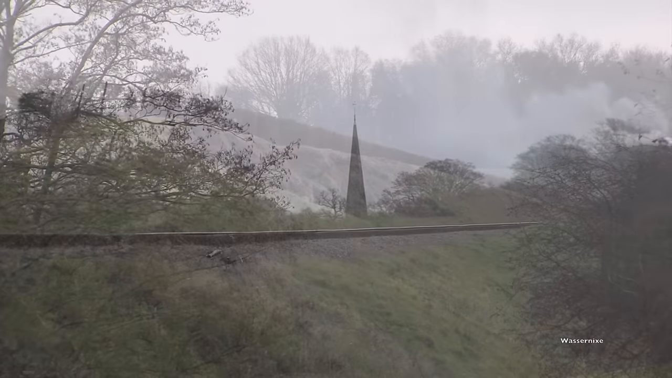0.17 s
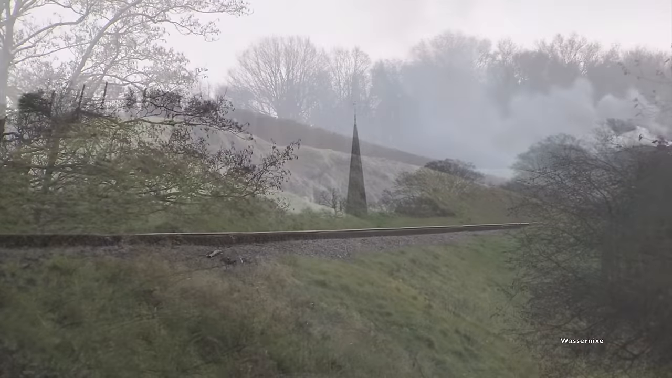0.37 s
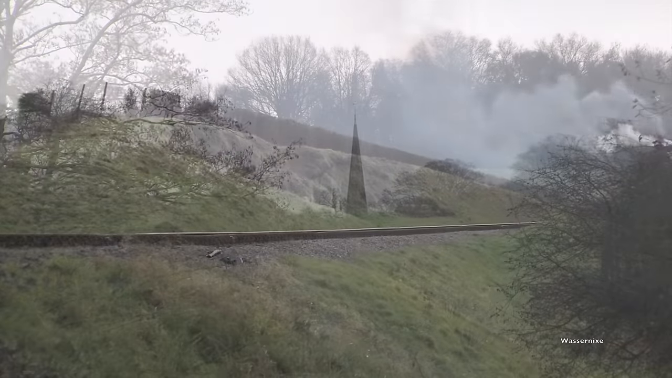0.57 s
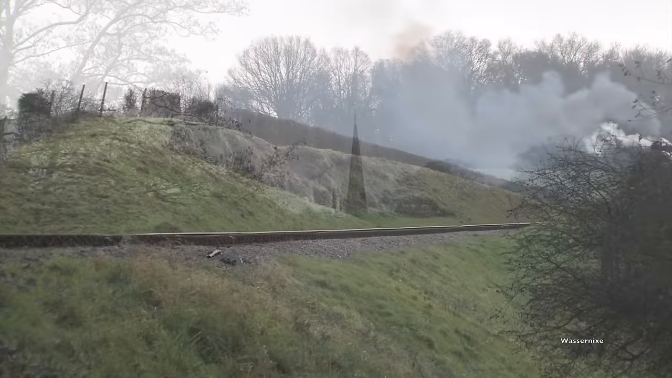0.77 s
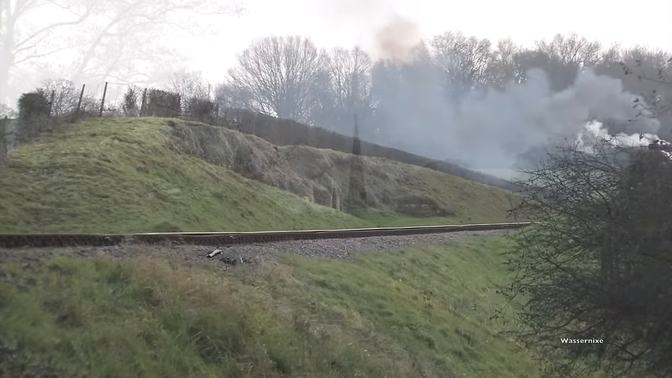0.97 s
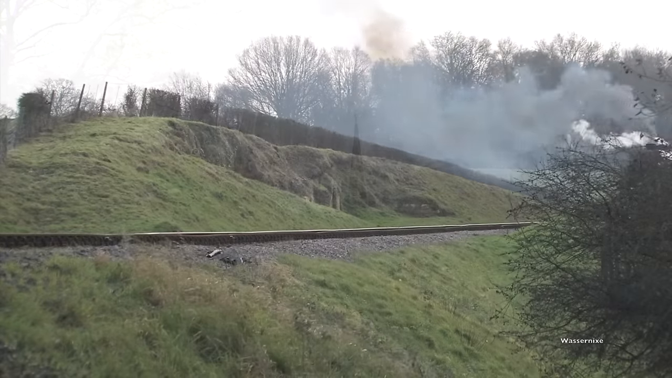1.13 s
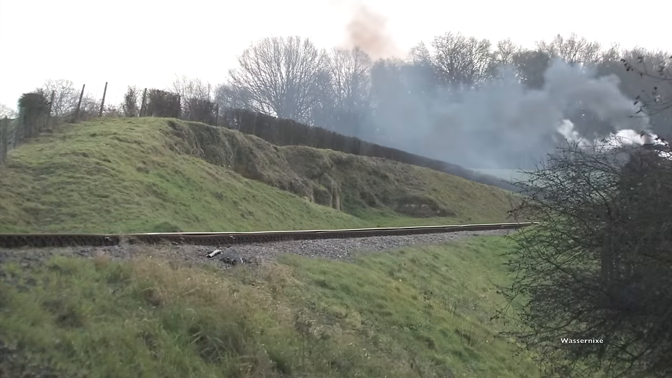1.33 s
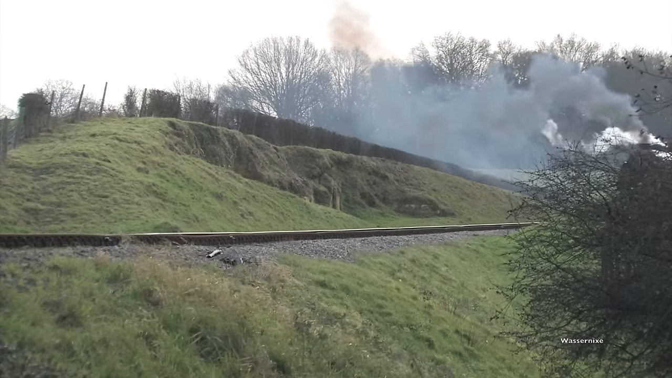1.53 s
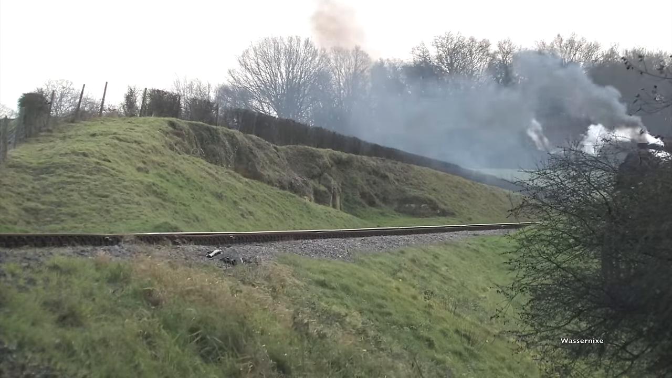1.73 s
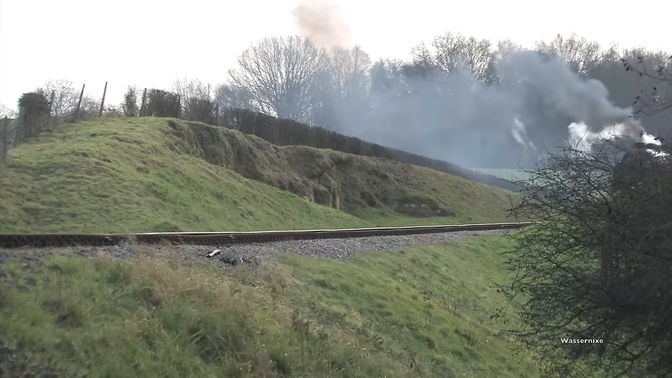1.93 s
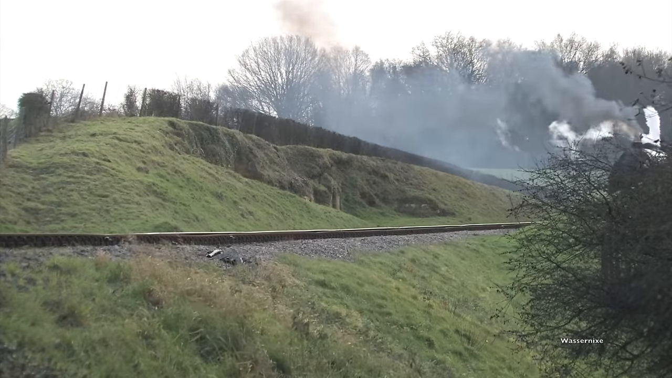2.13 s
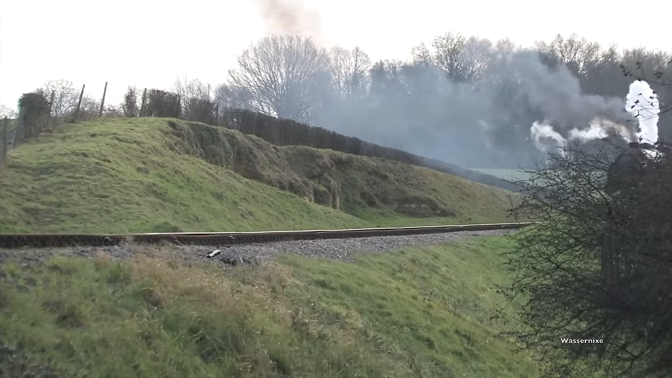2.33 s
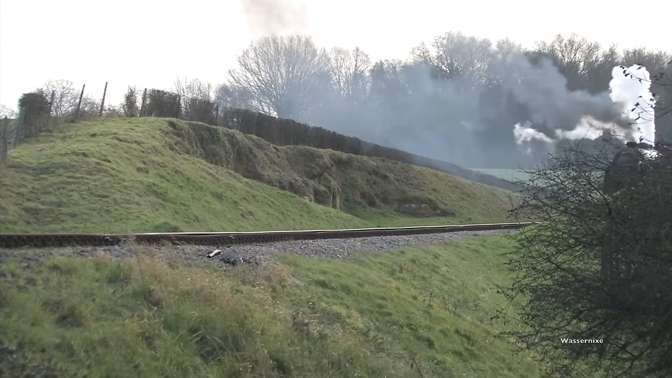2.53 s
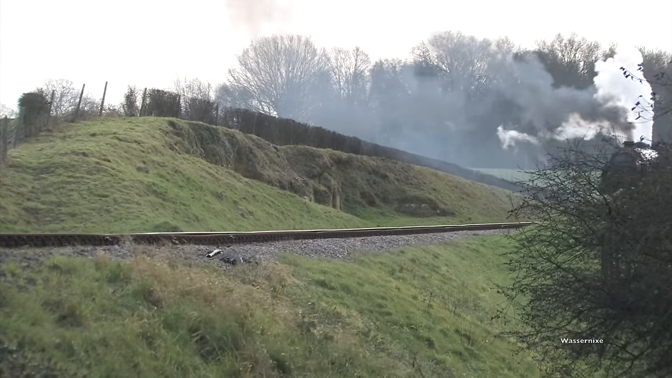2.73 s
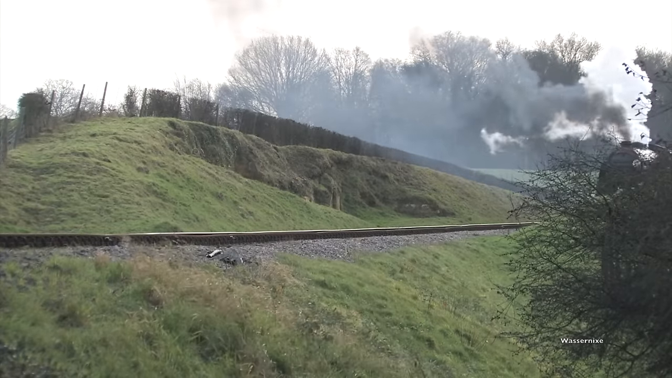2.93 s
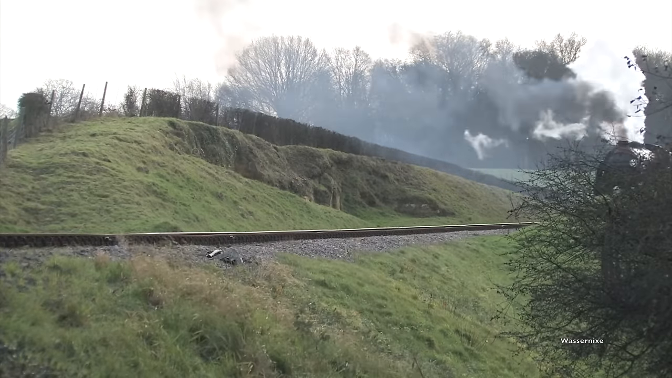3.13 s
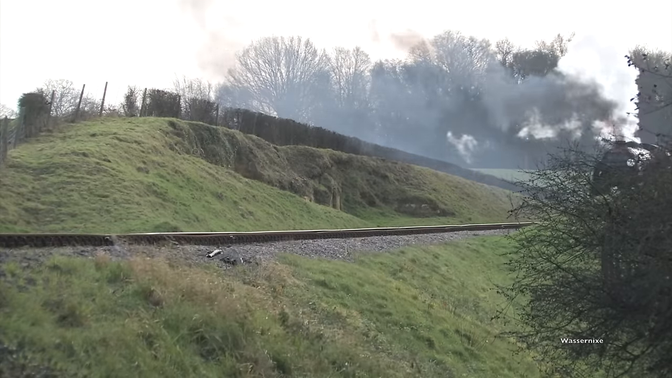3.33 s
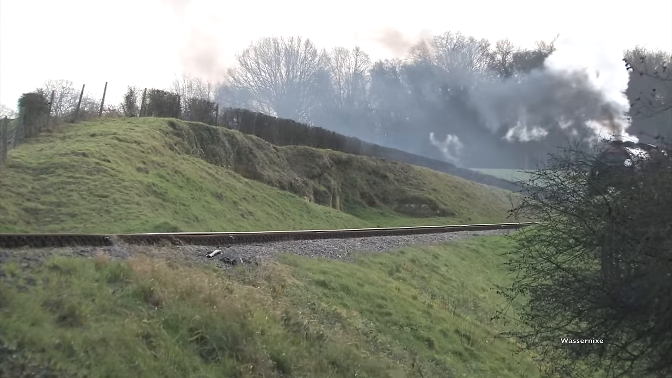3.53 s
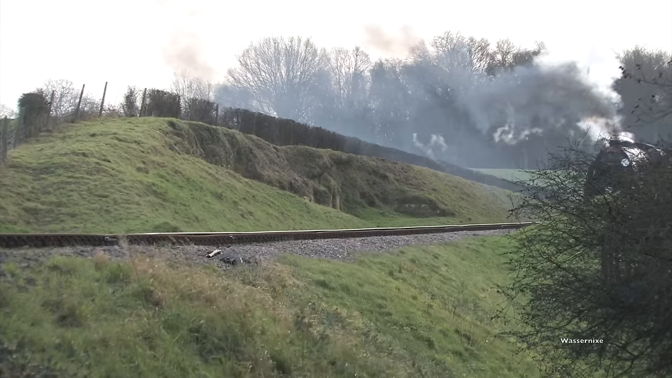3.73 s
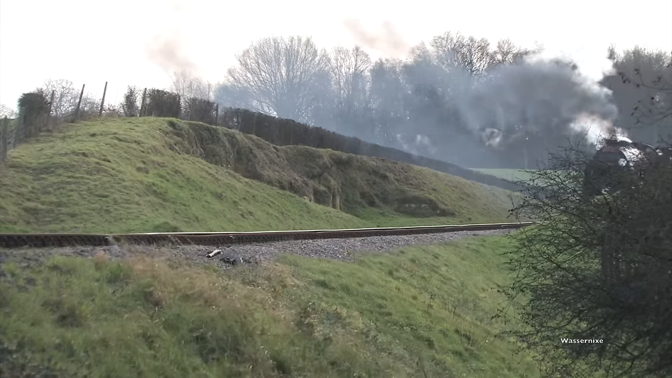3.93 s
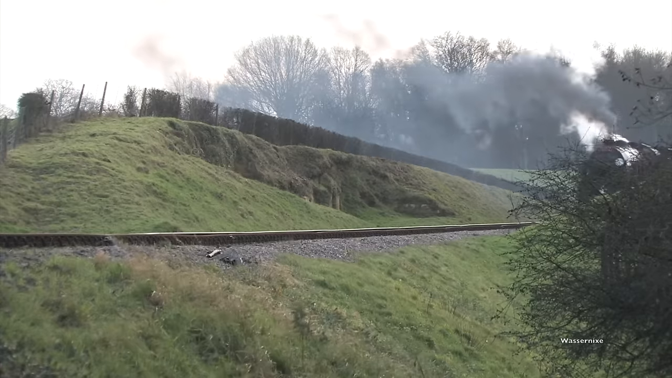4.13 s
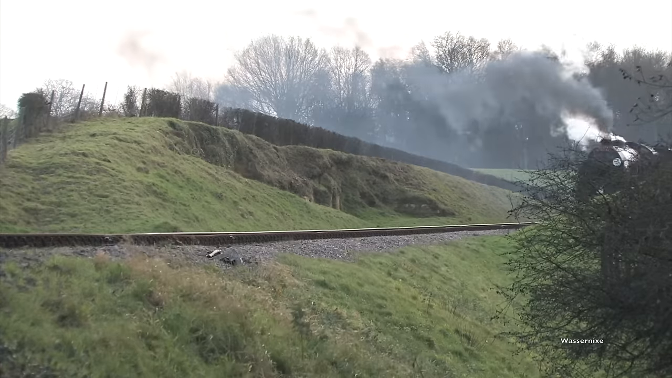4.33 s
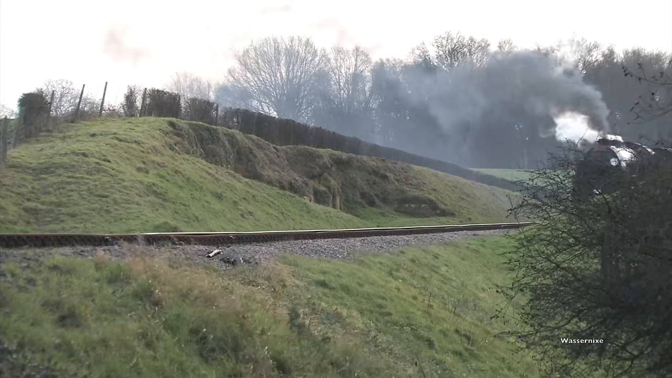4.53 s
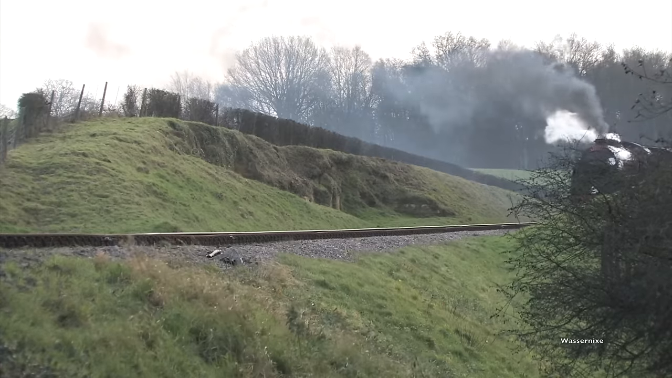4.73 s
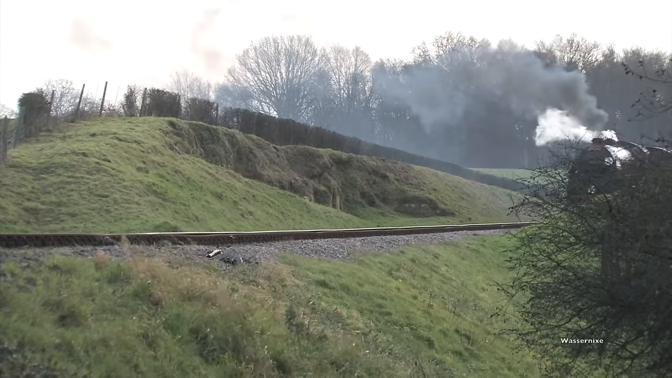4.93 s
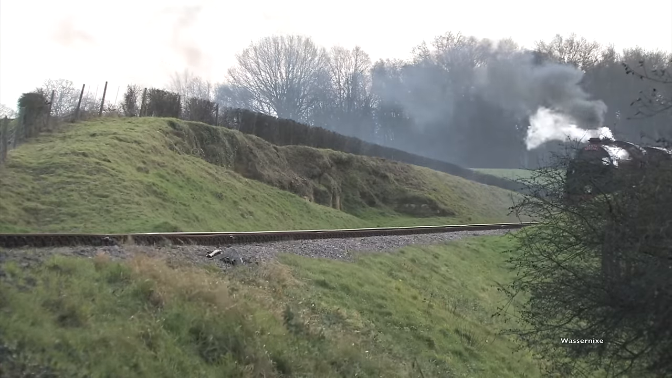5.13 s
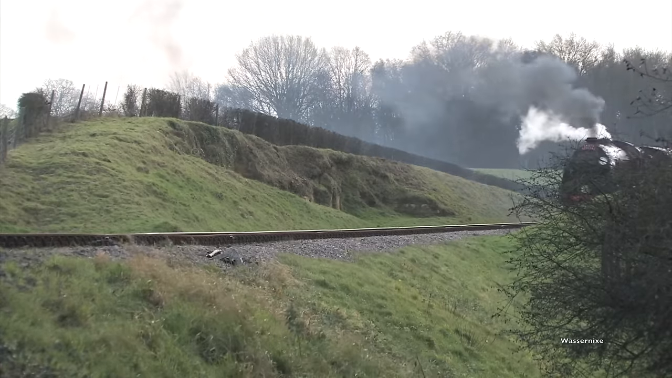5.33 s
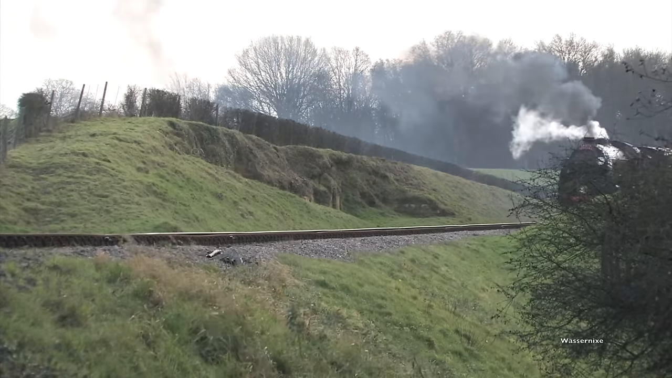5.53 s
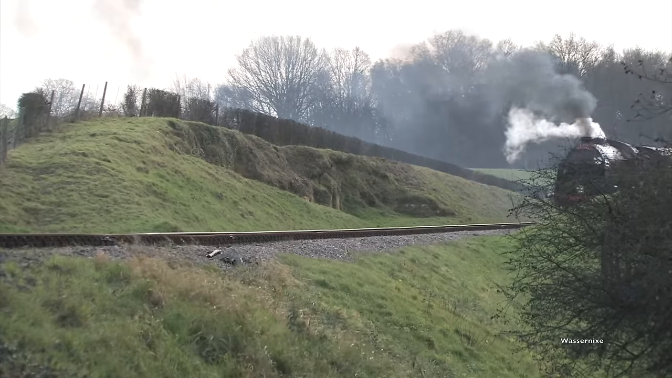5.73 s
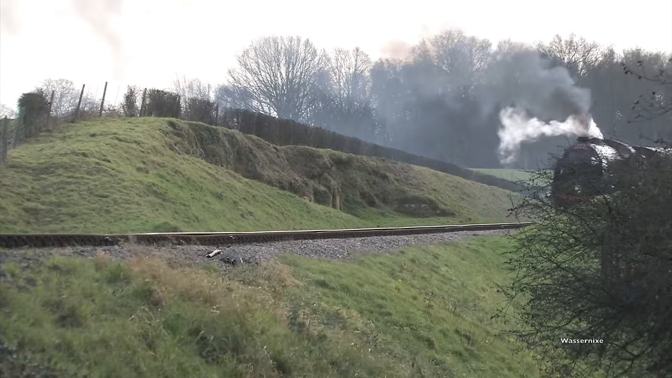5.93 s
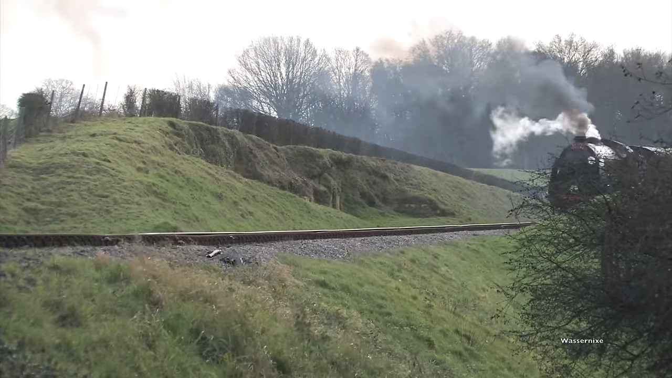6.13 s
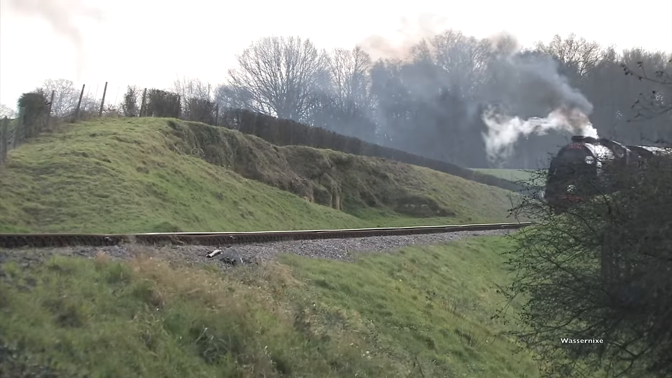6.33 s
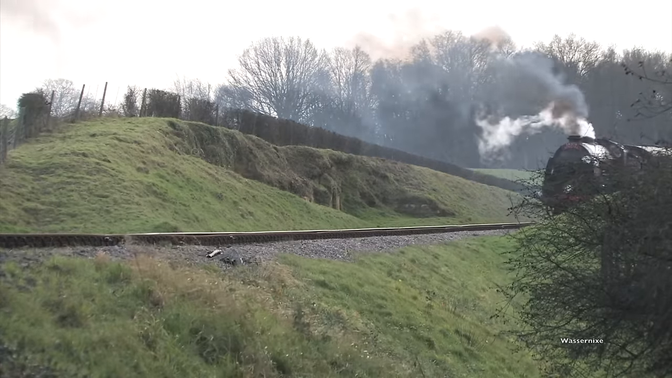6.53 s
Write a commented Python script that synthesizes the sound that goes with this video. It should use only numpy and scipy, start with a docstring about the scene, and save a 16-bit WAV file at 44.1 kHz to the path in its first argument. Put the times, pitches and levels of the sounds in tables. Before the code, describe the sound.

A steam locomotive rumbles and hisses quietly, then its whistle gives one long shrill, overloading blast and one short one, ringing away over the hills.

```python
"""Open country: a steam locomotive rolls slowly by its engine rumble, leaking steam and singing wheels.
A thin high whine sinks back, a small bird chips faintly, and flanges rub the rails before and after the whistle.
Then one long blast and one short scoop up as the valve opens, from surging steam on a bell, and ring on from
a grassy bank nearby and the far hills and woods. The loudest peaks overload the microphone and are cut flat.
Rumble, steam and air are shaped noise, wheels are shaken resonances, whistle and whine are built from sines."""
import sys
import numpy as np
from scipy import signal
from scipy.fft import rfft, irfft
from scipy.io import wavfile
from scipy.ndimage import uniform_filter1d

SR = 44100
rng = np.random.default_rng(int(sys.argv[2]) if len(sys.argv) > 2 else 0)


def master_out(mix):
    """Clip the mix to full scale and print it as 16-bit PCM to the path in sys.argv[1]."""
    frames = np.transpose(np.atleast_2d(mix))
    ceiling = np.clip(frames, -1, 1)
    pcm = np.round(ceiling * 32767).astype(np.int16)
    wavfile.write(sys.argv[1], SR, pcm)


N = 290178
TIME = np.arange(N) / SR  # s

# Levels are relative: each source adds its own trim. Noise spectra are in dB per Hz, then evened to rms 1.
# engine rumble: frequency_hz, density_db
RUMBLE_SPECTRUM = [(15, -44), (28, -28.5), (45, -5), (100, -5.5), (160, 1), (250, -13), (450, -19),
                   (1000, -33.5), (4000, -67)]
# the labouring engine, eased off at the whistle: time_s, level_db
RUMBLE_LEVEL = [(0.0, -46), (0.25, -47), (2.01, -43.5), (2.5, -46.5), (5.27, -52), (6.55, -52)]
# leaking steam: frequency_hz, density_db
LEAK_SPECTRUM = [(500, -4), (1500, -5), (2700, -4), (3900, -1.5), (4700, 1), (5300, -4.5), (5900, -15),
                 (7700, -11), (9500, -27), (15000, -43)]
# loudness of leaking steam and rolling wheels, fades in at the start, then swells slowly: time_s, level_db
STEAM_AND_WHEELS_LEVEL = [(0, -55), (1.15, -48.5), (2.6, -44), (4.8, -45.5), (6.58, -41.5)]
# the open air: frequency_hz, density_db
AIR_SPECTRUM = [(20, -25.5), (150, -2), (300, 1), (520, -1.5), (1000, -7), (2500, -15.5), (6000, -16),
                (9000, -25), (15000, -35)]
# likeness of left and right in the background: frequency_hz, likeness_0_to_1
LIKENESS = [(30, .2), (120, 0.43), (500, 0.34), (2000, 0.56), (4500, 0.21), (9000, 0.2)]
# resonances of wheels and rails: frequency_hz, width_hz, rolling_level_db
WHEEL_MODES = [(1580, 50, -11), (2060, 103, -5), (3200, 130, -2.5), (3510, 95, -10.5), (4530, 470, -6)]
# a flange rubs the rail and wakes modes near one frequency: middle_s, half_length_s, frequency_hz, level_db
FLANGE_RUBS = [(.97, 0.17, 4060, -51), (1.41, .06, 4800, -50), (1.65, 0.35, 2050, -52),
               (1.74, 0.086, 4500, -47.5), (1.913, 0.035, 3200, -50), (2.32, 0.052, 4300, -49),
               (5.396, 0.062, 4320, -52), (5.89, 0.043, 3100, -50), (6.116, 0.098, 4480, -48),
               (6.424, 0.16, 3815, -45)]
# lines of the thin high whine: frequency_hz, level_db
WHINE_LINES = [(5098, -68.5), (5399, -63), (5701, -65.5), (6002, -88)]
# rise and fall of the whine: time_s, gain_db
WHINE_FADE = [(0, 6), (.55, 2.5), (.8, -4), (6.58, -2.5)]
# faint chips of a small bird: middle_s, frequency_hz, level_db
BIRD_CHIPS = [(.455, 6230, -54), (.625, 6200, -57), (.668, 6200, -50)]
# whistle blasts: start_s, opening_s, shut_s, closing_s, jet_strength_db
BLASTS = [(2.647, .062, 3.395, 0.01497, 0.5), (3.512, .050, 3.661, 0.0125, -2.5)]
# the driver's pull on the open valve, surging, easing, then held: time_s, pitch_hz, jet_strength_db
DRIVER_PULL = [(2.71, 1021, -22.5), (2.762, 1030, -20.5), (2.896, 1046, -13), (3.006, 1021, -22),
               (3.046, 1015, -25.5), (3.132, 1014, -18), (3.22, 1022, -20), (3.375, 1011, -20.5)]
USUAL_JET_DB = -20
# partials 1 to 4: level_db at the usual jet, gain_db_per_jet_db, drift_db_per_s as the engine rolls on,
# overblown_change_db, half_open_change_db
PARTIALS = [(-10, 0.34, -2, -9, .5), (-15, 0.37, -15.5, 1.5, -8), (-15.5, .5, -1.5, 8.5, -4.5),
            (-22, 1.64, -1.5, -1, 9)]
# partials 5 and up: level_db against the steam rush
OVERTONE_LEVELS = [-4, -15, -18, -25]
# the note tips over into its third partial: middle_s, half_length_s
OVERBLOW = (3.155, .07)
# partials 1 to 6 as sent out to the hills: level_db
SENT_LEVELS = [-9, -18.5, -20.5, -19.5, -27, -31]
# the jet's rush, coloured by the bell: frequency_hz, density_db
RUSH_SPECTRUM = [(100, -36), (500, -21), (820, -10), (1200, -6.5), (1600, -15), (2200, -10), (2700, -15),
                 (3250, -5.5), (3800, -7), (4350, -2), (4850, -8.5), (5900, -23), (8200, -24.5),
                 (13000, -56)]
# bell modes the jet only roughens, out of tune with the note: multiple_of_pitch, width_hz, level_db
BELL_MODES = [(3.19, 110, -8), (4.18, 130, -2), (4.43, 89.5, -7.5)]
# grassy bank nearby: frequency_hz, decay_t60_s
BANK_T60 = [(1000, 1.55), (6000, 0.61)]
# grassy bank nearby: frequency_hz, echo_level_db
BANK_COLOUR = [(700, -7.5), (1000, -10.5), (3000, -9), (4500, -8.5), (7000, -2.5)]
# grassy bank nearby: frequency_hz, right_over_left_db
BANK_BALANCE = [(1000, 2), (6000, 5.6)]
# far hills and woods: frequency_hz, decay_t60_s
HILLS_T60 = [(300, 1), (1000, 5), (2000, 4), (3000, 3.5), (4100, 3), (6000, 1.5), (10000, 5)]
# far hills and woods: frequency_hz, echo_level_db
HILLS_COLOUR = [(300, -13.5), (800, -23.5), (1020, -8.5), (2000, -8.5), (4100, -9.5), (6000, -12.5),
                (10000, -25)]
# far hills and woods: frequency_hz, right_over_left_db
HILLS_BALANCE = [(600, 4.6), (1000, 11.2), (2000, 2.7)]
# the moving engine is heard at a different pitch from each slope: pitch_ratio, level_db, build_up_s
SLOPES = [(.985, -1.5, .35), (.998, -3, .6)]
EDGE_HZ = 15800  # upper band limit


def gain_of(db):
    """Amplitude factor of a level in dB."""
    return 10 ** (np.asarray(db) / 20)


def evened(x):
    """Scales to rms 1."""
    return x / np.sqrt(np.mean(x ** 2) + 1e-20)


def spectrum_at(points, hz):
    """Reads a spectrum table on a log-frequency axis."""
    table_hz, value = np.transpose(points)
    return np.interp(np.log(hz + 1), np.log(table_hz + 1), value)


def curves(rows):
    """Each column of a time table after the first, at every sample."""
    time_s, *columns = np.transpose(rows)
    return [np.interp(TIME, time_s, column) for column in columns]


def panned(right_db):
    """Gains of left and right, with the right channel stronger by right_db."""
    return gain_of(np.array([[-right_db], [right_db]]) / 2)


def wander(hz, size=N):
    """Smooth chance of rms about 1, whose faster changes weaken above hz."""
    step = 16  # samples between random knots
    knots = rng.standard_normal(size // step + 2)
    f = np.fft.rfftfreq(len(knots), step / SR)
    knots = evened(irfft(rfft(knots) / (1 + (f / hz) ** 2), len(knots)))
    return np.interp(np.arange(size) / step, np.arange(len(knots)), knots)


def noise(spectrum, patchy_db, same=None):
    """Stereo turbulence: noise of a given spectrum, with uneven patches in time and frequency."""
    frame, hop = 2048, 1024  # samples
    hz = np.fft.rfftfreq(frame, 1 / SR)
    a, b, c, d, patches = rng.standard_normal((5, len(hz), N // hop + 4))
    patches = uniform_filter1d(patches, size=4, axis=1)
    patches = evened(uniform_filter1d(patches, size=18, axis=0))
    if same is None:
        same = spectrum_at(LIKENESS, hz)[:, None]
    same = np.clip(same, 0, 1)
    left = a + 1j * b
    right = same * left + np.sqrt(1 - same ** 2) * (c + 1j * d)
    colour = gain_of(spectrum_at(spectrum, hz)[:, None] + patchy_db * patches)
    bins = np.array([left, right]) * colour
    return evened(signal.istft(bins, window="cosine", nperseg=frame, noverlap=hop)[1][:, :N])


def hoarse(hz, width, apart=0.18):
    """A resonance along the curve hz, shaken at random, a little different at each side."""
    carrier = np.exp(2j * np.pi * np.cumsum(hz) / SR)

    def shaken():
        real_part = wander(width * 0.43, size=len(hz))
        imaginary_part = wander(width * 0.64, size=len(hz))
        return (carrier * (real_part + 1j * imaginary_part)).real

    mid, side = shaken(), shaken()
    return evened(np.array([mid + apart * side, mid - apart * side]))


def engine(air_db=-46.5, rumble_db=2.5):
    """Low rumble and steam hissing from leaks, in the open air: three layers of turbulent noise."""
    rumble = gain_of(rumble_db + curves(RUMBLE_LEVEL)[0]) * noise(RUMBLE_SPECTRUM, patchy_db=1.5)
    leak = gain_of(curves(STEAM_AND_WHEELS_LEVEL)[0]) * noise(LEAK_SPECTRUM, patchy_db=3.0)
    air = gain_of(air_db) * noise(AIR_SPECTRUM, patchy_db=1)
    return (rumble + leak + air) * panned(right_db=4.0)


def rails(rolling_db=-10.5, rubbing_db=-2.5, uneven_db=3.0, reach_octaves=0.36):
    """Wheel and rail modes sing thinly in rolling, and swell hoarsely where a flange rub lies near in pitch."""
    out = np.zeros((2, N))
    rolling_level_db = rolling_db + curves(STEAM_AND_WHEELS_LEVEL)[0]
    swells = [gain_of(rubbing_db + db) * np.exp(-((TIME - middle) / half) ** 2)
              for middle, half, _, db in FLANGE_RUBS]
    for hz, width, db in WHEEL_MODES:
        rubbing = 0
        for swell, (_, _, rub_hz, _) in zip(swells, FLANGE_RUBS):
            rubbing = rubbing + swell * np.exp(-(np.log2(hz / rub_hz) / reach_octaves) ** 2)
        level = (gain_of(rolling_level_db + db) + rubbing) * gain_of(uneven_db * wander(hz=17))
        out += level * hoarse(np.full(N, hz), width)
    return out * panned(right_db=2.0)


def whine():
    """Thin lines of fixed pitch, wavering together in level, that soon sink into the background."""
    lines = sum(gain_of(db) * np.sin(2 * np.pi * (hz * TIME + rng.random())) for hz, db in WHINE_LINES)
    level = gain_of(curves(WHINE_FADE)[0] + wander(hz=8))
    return np.sqrt(2) * lines * level * panned(right_db=-5)


def bird(length_s=.009, rough=.03):
    """Very short high notes, raspy because their pitch is shaken at random."""
    rasp = 1 + rough * wander(hz=500)
    out = np.zeros(N)
    for middle, hz, db in BIRD_CHIPS:
        swell = gain_of(db) * np.exp(-((TIME - middle) / length_s) ** 2)
        out += swell * np.sin(2 * np.pi * np.cumsum(hz * rasp) / SR)
    return out


def valve():
    """Steam pressure at the whistle as the valve moves, 0 shut to 1 open."""
    return sum(np.clip(np.minimum((TIME - start) / opening, (shut - TIME) / closing), 0, 1)
               for start, opening, shut, closing, _ in BLASTS)


def jet():
    """Strength of the steam jet from pull and blast, in dB over the usual."""
    blast_db, = curves([(s, db) for start, _, shut, _, db in BLASTS for s in (start, shut)])
    return curves(DRIVER_PULL)[1] + blast_db - USUAL_JET_DB


def pitch(pressure, scoop=.28, bend=1.3):
    """The note (Hz) scoops up as the valve opens and drops as it shuts."""
    return curves(DRIVER_PULL)[0] * (1 - scoop * (1 - pressure) ** bend)


def rush_level(usual_db=-23.5, follows=0.95):
    """The rush of steam grows with the jet (dB)."""
    return usual_db + follows * jet()


def partial_levels(pressure):
    """A harder jet brightens the note; overblown, the third partial takes over; half open, the fourth shrieks (dB)."""
    middle, half = OVERBLOW
    overblown = np.exp(-((TIME - middle) / half) ** 4)
    half_open = np.sin(np.pi * pressure ** 2)
    since, jet_db = TIME - BLASTS[0][0], jet()
    low = [db + follows * jet_db + drift * since + over_db * overblown + half_db * half_open
           for db, follows, drift, over_db, half_db in PARTIALS]
    return low + [rush_level() + db for db in OVERTONE_LEVELS]


def whistle(pressure, jitter=0.0026, stumble=.025, flutter_db=0.67, sway_db=1.65, speaks_at=0.39, richness=1.0):
    """The bell's tone, flat and pure at low pressure, rich at full: as heard along the ground, and as sent aloft."""
    on = pressure > 0
    unsteady = (jitter + stumble * (1 - pressure)) * wander(hz=130)  # least with the valve fully open
    phase = 2 * np.pi * np.cumsum(pitch(pressure) * (1 + unsteady))[on] / SR
    first = np.clip(pressure[on] / speaks_at, 0, 1) ** 2
    near, aloft = np.zeros((2, N)), np.zeros(N)
    for k, db in enumerate(partial_levels(pressure), 1):
        share = first if k == 1 else first * pressure[on] ** richness
        partial = np.sqrt(2) * share * np.sin(k * phase + rng.uniform(0, 2 * np.pi))
        flutter = flutter_db * min(k, 4) * wander(hz=69)[on]  # turbulent air shakes high partials most
        sway = sway_db * np.array([wander(hz=16)[on] for _ in range(2)])  # slower, different at each side
        near[:, on] += gain_of(db[on] + flutter + sway) * partial
        if k <= len(SENT_LEVELS):
            aloft[on] += gain_of(SENT_LEVELS[k - 1]) * partial
    return near, aloft


def rush(pressure, hiss_db=6, ring_db=-1.0, hiss_lag=0.43, ring_lead=0.22, hiss_onset=1.6, ring_onset=1.0):
    """Steam tears past the bell's lip and makes its upper modes ring hoarsely; a harder jet rings more."""
    hiss = noise(RUSH_SPECTRUM, patchy_db=3.5, same=0.84) * pressure ** hiss_onset
    note_hz, jet_db = pitch(pressure), jet()
    modes = sum(gain_of(db) * hoarse(k * note_hz, width) for k, width, db in BELL_MODES)
    ring = modes * pressure ** ring_onset
    mixed = gain_of(hiss_db - hiss_lag * jet_db) * hiss + gain_of(ring_db + ring_lead * jet_db) * ring
    return gain_of(rush_level()) * mixed


def echoes(x, colour, t60, balance, build_s, same):
    """Scattered reflections: a noise tail that builds up, then dies at its own speed in each band."""
    a, b = rng.standard_normal((2, 4 * SR)) / np.sqrt(SR)
    same = np.clip(same, 0, 1)
    right = same * a + np.sqrt(1 - same ** 2) * b
    hz, t, bins = signal.stft([a, right], SR, nperseg=512)
    rate = np.log(1000) / spectrum_at(t60, hz)[:, None]  # 60 dB of decay in one t60
    decay = np.sqrt(2 * rate) * np.exp(-rate * t) * (1 - np.exp(-t / build_s))
    side_db = np.outer([-.5, .5], spectrum_at(balance, hz))
    bins = bins * decay * gain_of(spectrum_at(colour, hz) + side_db)[..., None]
    tail = signal.istft(bins, SR, nperseg=512)[1]
    return signal.fftconvolve(x[None], tail, axes=1)[:, :N]


def blasts(tone_db=-.8, far_steam_db=-13):
    """The whistle heard directly, off the nearby bank, and off the far hills at shifted pitches."""
    pressure = valve()
    near, aloft = whistle(pressure)
    steam = rush(pressure)
    direct = gain_of(tone_db) * near * panned(right_db=2.5) + steam * panned(right_db=4)
    bank = echoes(direct.mean(0), BANK_COLOUR, BANK_T60, BANK_BALANCE, build_s=0.0057, same=0.28)
    sent = aloft + gain_of(far_steam_db) * steam[0]
    start, hills = BLASTS[0][0], 0
    for ratio, db, build_s in SLOPES:
        shifted = gain_of(db) * np.interp(start + (TIME - start) * ratio, TIME, sent)
        hills = hills + echoes(shifted, HILLS_COLOUR, HILLS_T60, HILLS_BALANCE, build_s, same=0.47)
    return direct + bank + hills


def scene():
    """All sources as they reach the stereo microphone."""
    mix = engine() + rails() + whine() + bird() + blasts()
    return np.array([mix[0], np.roll(mix[1], 1)])  # sound reaches the right side one sample later


def record(dry):
    """The overloaded microphone cuts the loudest peaks flat; then the treble is band-limited."""
    clipped = np.clip(dry * gain_of(0.23), -1, 1)
    lowpass = signal.firwin(255, EDGE_HZ, window=("kaiser", 8), fs=SR)
    return signal.oaconvolve(clipped, lowpass[None], "same")


dry = scene()
out = record(dry)
master_out(out)
```